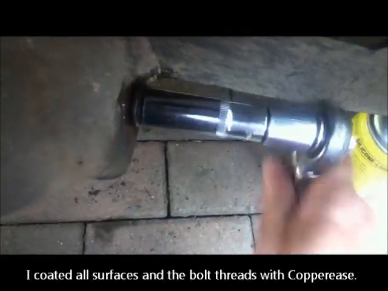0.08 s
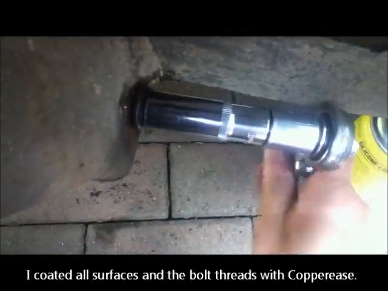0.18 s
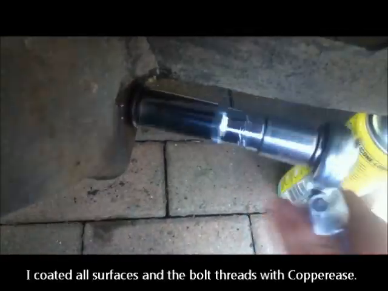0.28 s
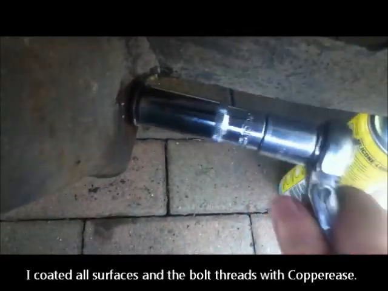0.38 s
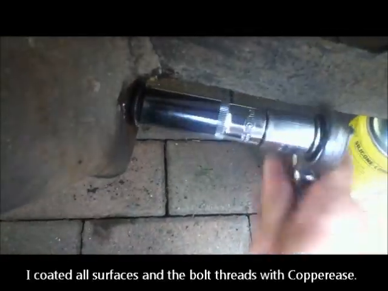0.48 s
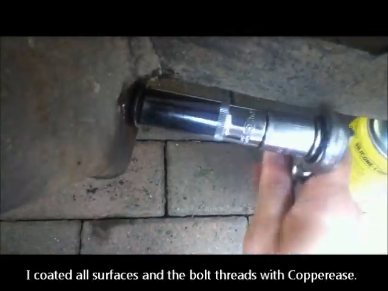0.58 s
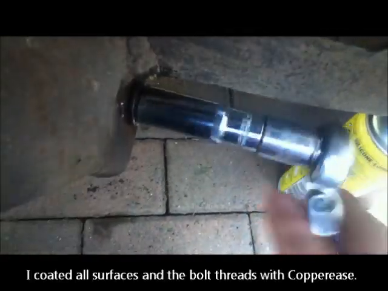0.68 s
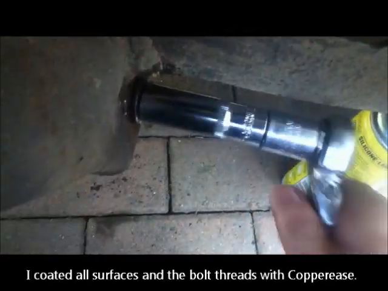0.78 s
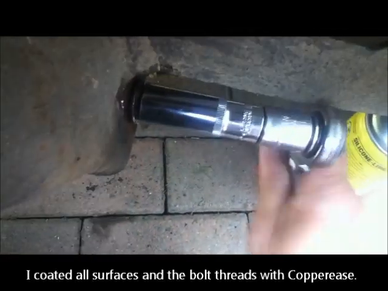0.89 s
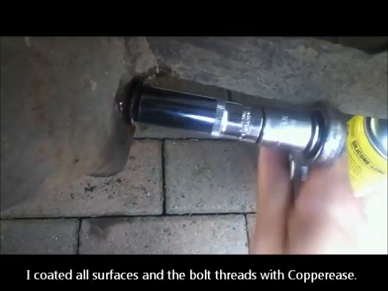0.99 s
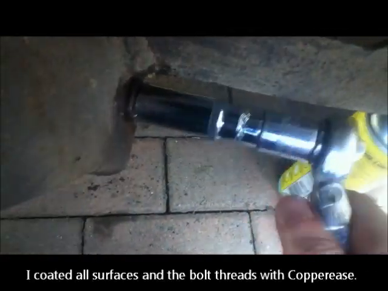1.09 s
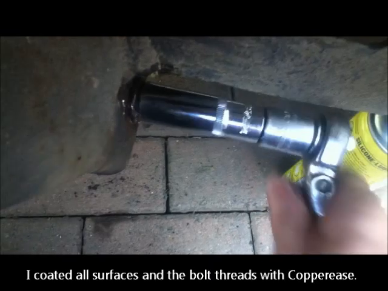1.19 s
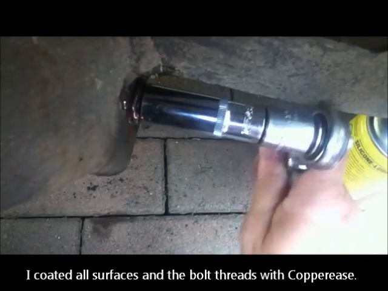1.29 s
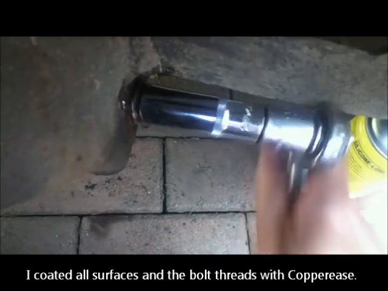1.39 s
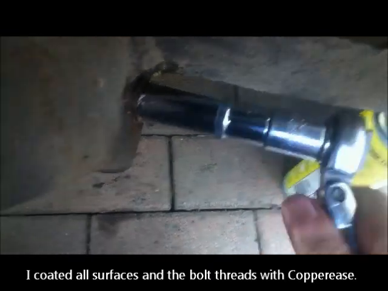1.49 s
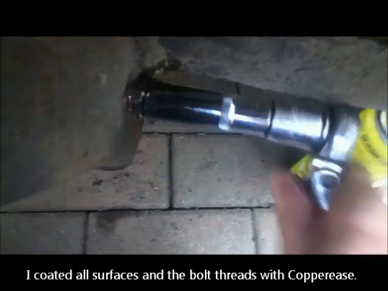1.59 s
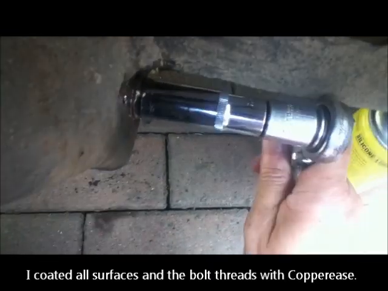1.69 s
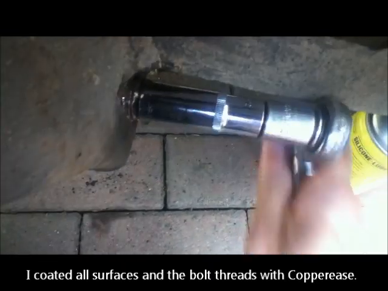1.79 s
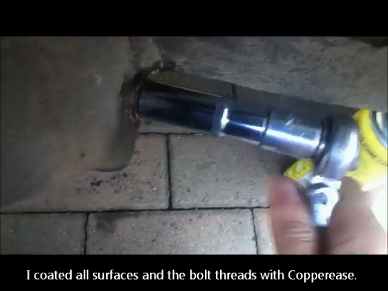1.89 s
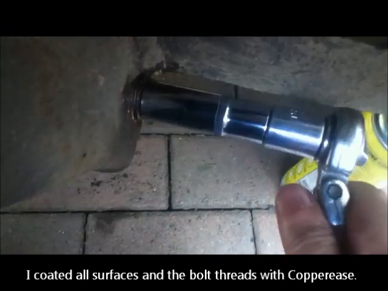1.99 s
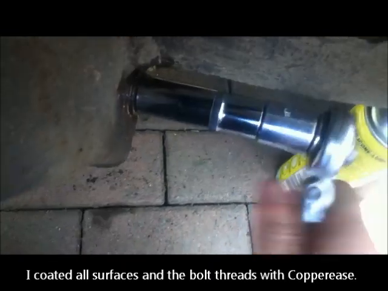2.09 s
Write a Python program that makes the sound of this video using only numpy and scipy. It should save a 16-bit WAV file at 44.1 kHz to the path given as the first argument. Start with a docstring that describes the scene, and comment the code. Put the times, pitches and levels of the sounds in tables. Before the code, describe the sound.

A hand ratchet clicks through five quick back strokes, its loose socket knocking between them, close up.

```python
"""A hand ratchet works a bolt close to a camera microphone, for about two seconds.
From the start there are grainy friction and a handling rumble, both shaped noise, over a quiet noise floor.
The loose socket and extension soon knock in their joints: bursts of contact noise ring decaying modes.
Then come five back strokes, the pawl rattling brightly over the teeth, slowing at the end of each, while
the friction swells with scrape; between them the knocks go on. Ground and underbody echo briefly."""
import sys
import numpy as np
from scipy import signal
from scipy.io import wavfile
from scipy.ndimage import uniform_filter1d

SR = 44100
rng = np.random.default_rng(int(sys.argv[2]) if len(sys.argv) > 2 else 0)


def how_loud(loudness_db):
    """Turn decibels into a plain amplitude multiplier (0 dB gives 1, 20 dB gives 10)."""
    steps = np.asarray(loudness_db, float) / 20
    return 10 ** steps


def output_pcm(signal):
    """Save a mono or channel-first signal as 16-bit PCM at the path in sys.argv[1].

    Samples are clipped to [-1, 1] before scaling.
    """
    pcm = np.clip(np.atleast_2d(signal).T, -1, 1) * 32767
    wavfile.write(sys.argv[1], SR, np.round(pcm).astype(np.int16))


N = 94815  # samples


def evened(x):
    """Scales to rms 1."""
    return x / np.sqrt(np.mean(x ** 2) + 1e-20)


def peaked(x):
    """Scales so that the loudest millisecond has the rms of a unit sine."""
    return x / np.sqrt(2 * uniform_filter1d(x ** 2, size=44).max())


def read(points, hz):
    """Reads a table on a log-frequency axis."""
    f, value = np.transpose(points)
    return np.interp(np.log(hz + 1), np.log(f + 1), value)


def coloured(x, points):
    """Filters with the given spectrum; minimum phase, so nothing sounds ahead of its cause."""
    gain_db = np.maximum(read(points, abs(np.fft.fftfreq(4096, 1 / SR))), -100)
    log_gain = np.log(how_loud(gain_db))
    phase = -signal.hilbert(log_gain).imag
    taps = np.fft.ifft(np.exp(log_gain + 1j * phase)).real[:2048]
    return signal.oaconvolve(x, taps)[:len(x)]


def add(mix, s, sound):
    """Mixes sound in at s seconds."""
    part = mix[round(s * SR):][:len(sound)]
    part += sound[:len(part)]


# Tone of the quiet place behind the tool. Each row: frequency in Hz, relative spectrum level in dB.
FLOOR_SPECTRUM = [(250, 0.5), (1700, -34.5), (16000, -31.5)]
FLOOR_DB = -64  # rms


def quiet_floor():
    """Steady noise, strongest in the bass."""
    return how_loud(FLOOR_DB) * evened(coloured(rng.standard_normal(N), FLOOR_SPECTRUM))


# Tone of the friction, close by. Each row: frequency in Hz, relative spectrum level in dB.
FRICTION_SPECTRUM = [(400, -1), (1300, 1), (1660, -12), (2440, -3.5), (9000, -17), (16000, -37)]
# Grainy friction of the hand, with the ratchet's scrape during the strokes, as a level # to follow. Each row:
# time in seconds, level in dB.
FRICTION_LEVEL = [(0., -58), (.09, -41.5), (.165, -56), (.24, -36.5), (.34, -72), (.38, -62), (.46, -42.5),
                  (.53, -58), (.59, -79), (.625, -29.5), (.73, -68), (.8, -51.5), (.87, -38.5),
                  (.99, -52.5), (1.03, -38), (1.16, -58.5), (1.24, -43.5), (1.37, -61.5), (1.4, -34),
                  (1.535, -62.5), (1.58, -43.5), (1.73, -61.5), (1.8, -46.5), (1.95, -65), (2., -47),
                  (2.15, -57)]
GRAINS_PER_S, GRAIN_DB = 830, 3.5


def friction():
    """Small random grains swell a noise that follows the hand and the strokes' scrape."""
    t = np.arange(N) / SR
    grain_db = GRAIN_DB * np.minimum(rng.exponential(1, N), 4)
    grains = how_loud(grain_db) * (rng.random(N) < GRAINS_PER_S / SR)
    grainy = rng.standard_normal(N) * (0.53 + uniform_filter1d(grains, size=40) * 8)
    level_db = np.interp(t, *np.transpose(FRICTION_LEVEL))
    return how_loud(level_db) * evened(coloured(grainy, FRICTION_SPECTRUM))


# Tone of the low handling noise. Each row: frequency in Hz, relative spectrum level in dB.
RUMBLE_SPECTRUM = [(30, -22.5), (110, 1.5), (400, -7.5), (1500, -48)]
# The handling rumble, as a level to follow. Each row: time in seconds, level in dB.
RUMBLE_LEVEL = [(0., -54), (.23, -41), (.39, -59), (.5, -39.5), (.8, -52.5), (.93, -38), (1.16, -58),
                (1.29, -39), (1.42, -44), (1.54, -69), (1.64, -37), (1.9, -59.5), (2.15, -64.5)]
LUMP_DB = 2.5  # rms swing of the lumps


def handling_rumble():
    """Low noise whose strength wanders in lumps of about a fiftieth of a second."""
    t = np.arange(N) / SR
    lumps = how_loud(LUMP_DB * evened(uniform_filter1d(rng.standard_normal(N), size=900)))
    rumble = evened(coloured(rng.standard_normal(N) * lumps, RUMBLE_SPECTRUM))
    return how_loud(np.interp(t, *np.transpose(RUMBLE_LEVEL))) * rumble


BOUNCE_DB = 1.5  # rms swing of the bounces


def chatter(rise_s, decay_s):
    """Noise of a contact that rattles out in uneven bounces."""
    t = np.arange(4000) / SR
    bounces = how_loud(BOUNCE_DB * evened(uniform_filter1d(rng.standard_normal(len(t)), size=50)))
    rise = np.minimum(t / rise_s, 1) ** 2
    decay = np.exp(-np.maximum(t - rise_s, 0) / decay_s)
    return rng.standard_normal(len(t)) * bounces * decay * rise


DETUNE = 0.012  # modes shift from blow to blow, as a fraction of their frequency


def ring(drive, modes, extra_db):
    """Sum of decaying modes struck by drive."""
    out = 0
    for (hz, db, t60), more_db in zip(modes, extra_db):
        hz = hz * (1 + DETUNE * rng.standard_normal())
        radius = 1000 ** (-1 / (t60 * SR))
        w = 2 * np.pi * hz / SR
        mode = signal.lfilter([1, 0, -1], [1, -2 * radius * np.cos(w), radius ** 2], drive)
        out = out + how_loud(db + more_db) * mode
    return out


# Modes of the ratchet head. Each row: frequency in Hz, relative level in dB, t60 in seconds.
HEAD_MODES = [(2830, -18.5, 0.0072), (4490, -4, 0.0088), (4770, -2.5, 0.0023), (7440, 9, 0.0039),
              (8300, 11, 0.0027), (9610, -1, 0.0035), (10440, -3, 0.0018), (11040, -5, 0.012),
              (12300, -4, 0.0053)]
# Modes of socket, extension and bracket. Each row: frequency in Hz, relative level in dB, t60 in seconds.
SHANK_MODES = [(530, -0.5, 0.018), (973, -1, 0.042), (1173, 7.5, 0.017), (1292.5, -0.5, 0.06),
               (2034, 15, 0.0046), (2350, -1.5, 0.011), (2647, 6.5, 0.031)]
# Toneless crack in the head. Each row: frequency in Hz, relative spectrum level in dB.
CRACK_SPECTRUM = [(900, -64), (1500, -10), (4200, -3.5), (12300, -7), (13800, -39.5)]
# Toneless clack in the shank. Each row: frequency in Hz, relative spectrum level in dB.
CLACK_SPECTRUM = [(90, -17), (500, -10.5), (1230, -4.5), (1830, -18.5), (2670, -5.5), (9000, -20),
                  (14000, -67.5)]
CLACK_DB = -4  # against the ringing shank
RISE_S, SHANK_RISE_S = 0.0017, 0.0014
SETTLE_DB = -19.5  # the rattle's share in the contact at the head
HEAD_SCATTER_DB, SHANK_SCATTER_DB = 6.5, -1  # random spread of mode levels from blow to blow
LOW_SHANK_HZ = 1600  # top of the low shank modes


def blow(contact_s, rattle_s, head_db, shank_db, crack_db, tint_db, low_db):
    """A contact rings and cracks in the head; the loose shank rattles on a little longer."""
    tick = chatter(RISE_S, contact_s) + how_loud(SETTLE_DB) * chatter(RISE_S, rattle_s)
    rattle = chatter(SHANK_RISE_S, rattle_s)

    head_scatter_db = HEAD_SCATTER_DB * rng.standard_normal(len(HEAD_MODES))
    head = peaked(ring(tick, HEAD_MODES, tint_db + head_scatter_db))
    head = peaked(head + how_loud(crack_db) * peaked(coloured(tick, CRACK_SPECTRUM)))

    low = np.transpose(SHANK_MODES)[0] < LOW_SHANK_HZ
    shank_scatter_db = SHANK_SCATTER_DB * rng.standard_normal(len(SHANK_MODES))
    shank = peaked(ring(rattle, SHANK_MODES, low_db * low + shank_scatter_db))
    # the clack shares the low lift in the octave below LOW_SHANK_HZ
    clack = [(hz, db + low_db * (LOW_SHANK_HZ / 2 < hz < LOW_SHANK_HZ)) for hz, db in CLACK_SPECTRUM]
    shank = peaked(shank + how_loud(CLACK_DB) * peaked(coloured(rattle, clack)))
    return how_loud(head_db) * head + how_loud(shank_db) * shank


# Play in the joints taken up, close to the microphone. Each row: start in seconds, shank level in dB,
# head level in dB, lift of the low shank in dB.
KNOCK_TIMES = [(0.021, -29.5, -33, 5), (0.0894, -26.5, -44, -2.5), (0.094, -30.5, -24.5, -12),
               (0.1119, -28, -43, -2.5), (0.1306, -24.5, -66, 21), (0.185, -22, -33.5, -4.5),
               (0.2007, -14, -50, 18), (0.2254, -13.5, -36, 11), (0.2288, -5.5, -15.5, -8.5),
               (0.3523, -39, -33, 5), (0.3958, -30.5, -39, -12), (0.5005, -12.5, -28, 5.5),
               (0.5566, -16, -10, -5), (0.5989, -27, -28, -2.5), (0.618, -28, -20, -37.5),
               (0.8317, -31, -55, 2), (0.865, -27.5, -28, -6), (0.9012, -7, -11, 4.5),
               (0.9558, -32, -63, 17.5), (1.0023, -32.5, -33.5, -1), (1.0202, -18.5, -55, -7),
               (1.1899, -31.5, -37, -2.5), (1.223, -32, -66, 16), (1.2858, -21, -22.5, 14.5),
               (1.2919, -27, -16, -19), (1.3249, -33, -50.5, 0.5), (1.366, -33.5, -61.5, 26),
               (1.3879, -18.5, -23, 4.5), (1.3946, -27.5, -10.5, 20), (1.5543, -37, -38.5, -1.5),
               (1.619, -31, -40.5, -5), (1.6282, -32, -29.5, -14), (1.6534, -19.5, -28, 3.5),
               (1.755, -21.5, -48, -7.5), (1.762, -34, -29, 1), (1.792, -28, -35, -1),
               (1.973, -30, -51, -5.5), (1.9988, -25.5, -31.5, 7), (2.0234, -40, -38, -27)]
KNOCK_CONTACT_S, SHANK_CHATTER_S = 0.0029, 0.0048  # decay time constants
KNOCK_CRACK_DB = 6.5  # against the ringing head


def joints():
    """Duller knocks, mostly in the shank, from slower contacts than the pawl's."""
    out = np.zeros(N)
    no_tint_db = np.zeros(len(HEAD_MODES))
    for s, shank_db, head_db, low_db in KNOCK_TIMES:
        knock = blow(KNOCK_CONTACT_S, SHANK_CHATTER_S, head_db, shank_db, KNOCK_CRACK_DB, no_tint_db, low_db)
        add(out, s, knock)
    return out


# The pawl dropping over a tooth, close by. Each row: start in seconds, head level in dB.
CLICK_TIMES = [(0.249, -5), (0.2588, -7.8), (0.268, -1), (0.2777, -13.5), (0.286, -8.5), (0.2959, -6.5),
               (0.3082, -7), (0.3252, -10.5), (0.631, -3), (0.6416, -8), (0.6522, -2.5), (0.6627, -4.5),
               (0.6738, -4), (0.6899, -5), (0.7086, -4.5), (0.7552, -4.5), (1.034, -5), (1.0428, -2.5),
               (1.052, -4.5), (1.0604, -8), (1.07, -3), (1.0806, -3), (1.0932, -8.5), (1.12, -6),
               (1.414, -3), (1.4231, -4.5), (1.4312, -8), (1.4418, -8.5), (1.4514, -3.5), (1.4614, -6),
               (1.4758, -6), (1.4986, -7), (1.8114, -3.5), (1.8228, -5.5), (1.8323, -10), (1.841, -4),
               (1.8537, -8.5), (1.8667, -10.5), (1.8954, -9.5)]
# Back strokes, each heard from another angle. Each row: lift in dB of the lower, the middle and
# the upper head modes.
STROKE_TINTS = [(-10.5, -6.5, 17.5), (-5.5, -5.5, 13), (0.5, -3.5, 7.5), (8, 0.5, 3.5), (8.5, -1, 13)]
STROKE_S = 0.39  # each stroke's clicks fall in its own span of this length
LOWER_HZ, MIDDLE_HZ, UPPER_HZ = 6500, 9000, 11000  # tops of lower and middle modes, centre of upper pair
PAWL_CONTACT_S, PAWL_RATTLE_S = 0.0012, 0.0057  # decay time constants
PAWL_SHANK_DB, CRACK_DB = -20, -12  # shank against the head, crack against the ringing head


def pawl():
    """Bright clicks; the turning head shows different modes to the microphone."""
    out = np.zeros(N)
    hz = np.transpose(HEAD_MODES)[0]
    for s, db in CLICK_TIMES:
        lower_db, middle_db, upper_db = STROKE_TINTS[int(s / STROKE_S)]
        tint_db = np.where(hz < LOWER_HZ, lower_db, middle_db * (hz < MIDDLE_HZ))
        tint_db = tint_db + upper_db * (abs(hz - UPPER_HZ) < 900)
        add(out, s, blow(PAWL_CONTACT_S, PAWL_RATTLE_S, db, db + PAWL_SHANK_DB, CRACK_DB, tint_db, 0))
    return out


# Echoes of the nearby ground and underbody. Each row: frequency in Hz, t60 in seconds.
ECHO_T60 = [(500, 0.12), (3000, 0.057), (9000, 0.017)]
ECHO_DB = -10.5


def echoes(x):
    """Sparse taps of random sign, each band dying at its own speed."""
    taps = np.zeros(SR // 4)
    at = np.arange(60, len(taps) - 10, 10)
    taps[at + rng.integers(0, 10, len(at))] = rng.choice([-1., 1.], len(at))
    hz, t, bands = signal.stft(taps, SR, nperseg=64)
    decay = how_loud(-60 * t / read(ECHO_T60, hz)[:, None])
    tail = signal.istft(bands * decay, SR, nperseg=64)[1]
    return how_loud(ECHO_DB) * signal.fftconvolve(x, tail / np.linalg.norm(tail))[:N]


def scene():
    """The floor, the friction, the rumble, the tool and its echoes, in one channel."""
    tool = joints() + pawl()
    return (quiet_floor() + friction() + handling_rumble() + tool + echoes(tool))[None]


def low_pass(x):
    """Removes everything above the highest recorded frequency."""
    return signal.sosfilt(signal.butter(12, 16520, fs=SR, output="sos"), x)


MIC_EDGE_HZ = 15600


def record(dry):
    """The microphone's steep upper band edge, then the full-scale limit."""
    band_edge = signal.cheby1(12, 1, MIC_EDGE_HZ, fs=SR, output="sos")
    mix = np.clip(signal.sosfilt(band_edge, dry), -1, 1)
    return low_pass(mix)


dry = scene()
out = record(dry)
output_pcm(out)
```